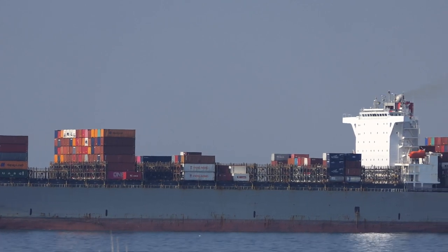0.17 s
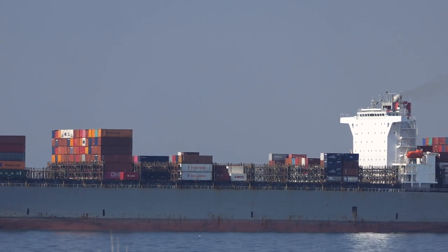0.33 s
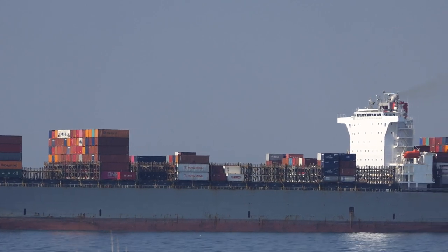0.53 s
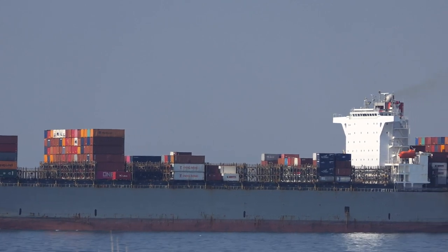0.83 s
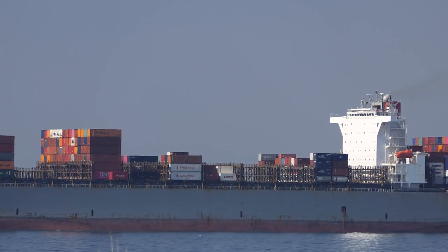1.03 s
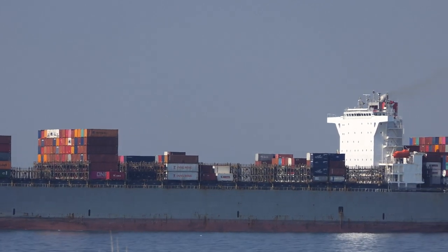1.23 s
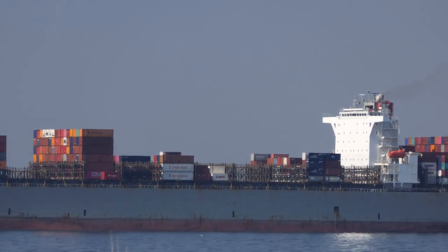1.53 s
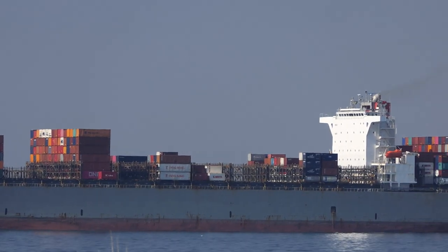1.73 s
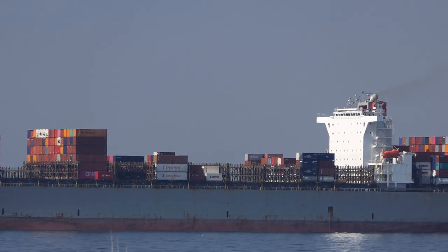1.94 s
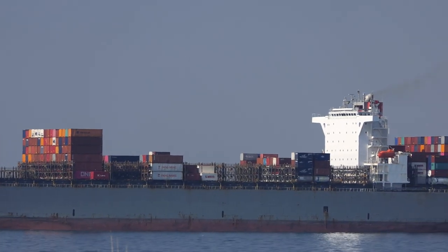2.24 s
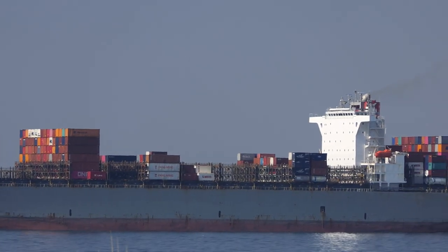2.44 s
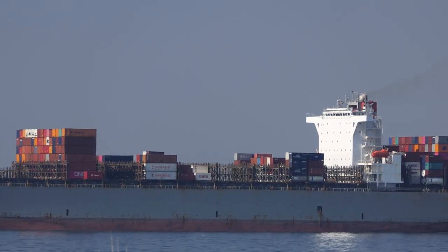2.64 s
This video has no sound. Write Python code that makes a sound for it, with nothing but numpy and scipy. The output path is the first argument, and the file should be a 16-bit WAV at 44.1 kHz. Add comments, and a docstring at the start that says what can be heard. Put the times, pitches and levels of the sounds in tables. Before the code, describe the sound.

A distant ship gives a steady, gently pulsing drone and deep rumble across open water. Midway, faint ticks and a rustle are followed by a soft bump, while light wind and a thin hiss sit on the microphone.

```python
"""A distant ship on calm water

A large ship passes far out. Its exhaust drones near 350 Hz over low engine tones and a dull rumble.
The drone reaches the two microphone openings in opposite phase: one is pushed as the other is pulled.
Light wind presses on the openings and the recorder hisses. There are small ticks, soft bumps, a faint
rustle and a brief faint ring near 1100 Hz. Below, left is mid + side and right is mid - side."""
import sys
import numpy as np
from scipy import signal
from scipy.fft import rfft, irfft
from scipy.io import wavfile
from scipy.ndimage import uniform_filter1d

SR = 44100
rng = np.random.default_rng(int(sys.argv[2]) if len(sys.argv) > 2 else 0)


def persist_wave(psi):
    """Save psi, clipped to +-1, as 16-bit WAV."""
    counts = np.round(np.clip(psi, -1, 1) * 32767).astype(np.int16)
    wavfile.write(sys.argv[1], SR, np.atleast_2d(counts).T)


N = 123479


def from_db(db):
    """Turn decibels into a number to multiply by."""
    return 10 ** (np.asarray(db) / 20)


def unit_power(x):
    """Scale a sound to an average power of 1."""
    return x / np.sqrt(np.mean(x ** 2) + 1e-20)


def over_time(rows):
    """Join (time_s, value) points with straight lines, giving a value for every sample."""
    return np.interp(np.arange(N) / SR, *np.transpose(rows))


def over_pitch(rows, hz):
    """Read between (pitch_hz, value) points at the given pitches."""
    pitches, values = np.transpose(rows)
    return np.interp(np.log(hz), np.log(pitches), values)


def resonate(x, hz, width_hz):
    """Let a sound ring at one pitch and weaken the pitches around it."""
    r = np.exp(-np.pi * width_hz / SR)
    gain = (1 - r * r) / 2
    return signal.lfilter([gain, 0, -gain], [1, -2 * r * np.cos(2 * np.pi * hz / SR), r * r], x)


def exhaust_drone():
    """The exhaust's main note wavers, swells and sinks; the ship's funnel keeps it in a narrow band."""
    # The note's wavering pitch: time_s, pitch_hz
    pitch = [(0, 350.7), (.1, 353), (.17, 354.3), (.25, 362.2), (.32, 349), (.45, 347), (.6, 351),
             (.8, 348.2), (.95, 354.5), (1.0, 348), (1.25, 349.9), (1.45, 350), (1.6, 358.7), (1.7, 344.3),
             (1.76, 357), (1.85, 345.6), (2.0, 343.8), (2.07, 356), (2.2, 351.3), (2.33, 348), (2.4, 348.3),
             (2.5, 345.9), (2.56, 352.1), (2.8, 344.5)]
    # The note's strength before the funnel: time_s, level_db
    swells = [(0.0, -38.5), (0.07, -45.5), (0.14, -37), (0.26, -50), (0.4, -34.5), (0.46, -43),
              (0.56, -34.5), (0.7, -46.5), (0.73, -46), (0.76, -40), (0.82, -59), (0.86, -30.5),
              (0.89, -40), (0.92, -42), (0.96, -31), (1.0, -39), (1.02, -37.5), (1.11, -39), (1.14, -36.5),
              (1.17, -43), (1.18, -37), (1.21, -66), (1.24, -35), (1.28, -36), (1.32, -51), (1.33, -33),
              (1.37, -52), (1.46, -32.5), (1.52, -39), (1.67, -53.5), (1.69, -37), (1.72, -34.5),
              (1.78, -49), (1.79, -50), (1.82, -35.5), (1.87, -52), (1.99, -32.5), (2.04, -45.5),
              (2.17, -42), (2.19, -35), (2.23, -41.5), (2.27, -33), (2.31, -43), (2.35, -32.5), (2.44, -47),
              (2.47, -32.5), (2.55, -36.5), (2.58, -49), (2.62, -41.5), (2.72, -54.5), (2.77, -32),
              (2.8, -33)]
    funnel_hz, funnel_width_hz = 359.1, 72
    side_boost_db, side_db_per_hz, side_lag_s = 20, 0.55, 0.00023
    # Slow noise blurs the note's phase and strength; most of the change in strength is evened out.
    below_3_hz = signal.butter(2, 3, fs=SR, output="sos")
    wander = [1, 1j] @ signal.sosfilt(below_3_hz, rng.standard_normal((2, N + SR)))[:, SR:]
    wander /= (abs(wander) + .2 * np.std(wander)) ** .95
    hz = over_time(pitch)
    note = unit_power(np.real(wander * np.exp(2j * np.pi * np.cumsum(hz) / SR)))
    note *= uniform_filter1d(from_db(over_time(swells)), int(.02 * SR))  # smoothed over 20 ms
    for _ in range(2):
        note = resonate(note, funnel_hz, funnel_width_hz)
    # Side is far stronger than mid, which puts left and right in opposite phase.
    side_gain = from_db(side_boost_db + side_db_per_hz * (hz - funnel_hz))
    mid, side = np.array([note, note * side_gain]) + exhaust_resonances()
    side = np.interp(np.arange(N) - side_lag_s * SR, np.arange(N), side)
    return np.array([mid + side, mid - side])


def exhaust_resonances():
    """Noise rings at the exhaust's weaker, steady pitches; returns mid and side."""
    # Resonances around the main note: pitch_hz, width_hz, mid_peak_db (power per Hz), side_boost_db
    resonances = [(232.4, 12, -71, 13), (254.3, 17, -72, 12), (278, 13, -66, 12), (310, 20, -61.5, 15),
                  (334, 16, -60, 16), (365, 14, -62.5, 20), (385, 12, -74, 22), (450.3, 18.4, -77, 13),
                  (543.5, 11.6, -81, 13)]
    out = 0
    for hz, width_hz, mid_db, side_boost_db in resonances:
        noise = np.sqrt(SR / 2) * rng.standard_normal(N + SR)  # power of 1 per Hz
        ring = resonate(resonate(noise, hz, width_hz), hz, width_hz)[SR:]
        out += ring * from_db([[mid_db], [mid_db + side_boost_db]])
    return out


def engine_tones():
    """The engine hums at a few low pitches, blurred by the long way the sound travels."""
    # The engine's tones: pitch_hz, level_db
    tones = [(30, -81), (54, -105), (60, -49), (91, -61), (167, -57.5)]
    out = 0
    for hz, db in tones:
        hum = resonate(rng.standard_normal(N + SR), hz, width_hz=1.38)[SR:]
        out += from_db(db) * unit_power(hum)
    return out


def wind():
    """Wind presses in slow lumps, almost alike on both microphone openings but harder on the left."""
    # The wind's pressure, midway between left and right: time_s, level_db
    gusts = [(0.0, -30.5), (0.58, -68), (0.6, -69), (0.93, -51.5), (1.52, -41.5), (1.81, -35.5),
             (1.85, -39.5), (2.37, -47.5), (2.42, -20), (2.52, -49), (2.56, -32), (2.8, -65)]
    unshared_gain, lean_db = 0.03, 3.5
    below_9_hz = signal.butter(3, 9, fs=SR, output="sos")
    lumps = signal.sosfilt(below_9_hz, rng.standard_normal((3, N + SR)))[:, SR:]
    shared, left, right = [unit_power(row - row.mean()) for row in lumps]
    pair = shared + unshared_gain * np.array([left, right])
    return from_db(over_time(gusts)) * pair * from_db([[lean_db], [-lean_db]])


def small_sounds():
    """Small ticks, soft bumps, and a brief faint ring near 1100 Hz as the drone swells."""
    # Each is a short puff of noise: start_s, peak_db, pitch_hz, rise_s, half_width_octaves
    puffs = [(1.2215, -55, 6480, 0.0011, 0.58), (1.2256, -47.5, 2100, 0.0015, 0.53),
             (1.2258, -49, 1150, 0.0033, 0.1), (1.2565, -48.5, 5040, 0.00086, 0.28),
             (1.284, -51, 2570, 0.0053, 0.73), (1.289, -47, 1200, 0.0021, 0.44),
             (1.295, -45.5, 3430, 0.00074, 0.81), (1.69, -41.5, 497.2, 0.019, 0.75),
             (1.70, -58, 1100, .012, 0.075), (2.06, -52.5, 1465, .0017, 0.53),
             (2.16, -59, 1192, .012, 0.17)]
    out, t = np.zeros(N), np.arange(4000) / SR
    for start_s, peak_db, hz, rise_s, octaves in puffs:
        band = signal.butter(3, [hz * 2 ** -octaves, hz * 2 ** octaves], "band", fs=SR, output="sos")
        puff = signal.sosfilt(band, rng.standard_normal(len(t)) * t * np.exp(-t / rise_s))
        start = int(start_s * SR)
        out[start:start + len(t)] += from_db(peak_db) * puff / abs(puff).max()
    return out


def rustle():
    """Thousands of tiny clicks blend into a faint rustle around the first ticks."""
    # The rustle's rise and fall: time_s, level_db
    loudness = [(1.2, -99), (1.225, -65), (1.26, -69), (1.295, -65.5), (1.32, -72.5), (1.5, -75.5),
                (1.6, -99)]
    clicks_per_s, band_hz = 4800, [1070, 4800]
    clicks = rng.standard_normal(N) * (rng.random(N) < clicks_per_s / SR)
    band = signal.butter(2, band_hz, "band", fs=SR, output="sos")
    return from_db(over_time(loudness)) * unit_power(signal.sosfilt(band, clicks))


def rumble_and_hiss():
    """A dull rumble and the recorder's hiss: noise whose level flickers slightly in each octave."""
    # Tone colour of the mid noise: pitch_hz, relative_db
    mid_colour = [(20, 3.5), (60, -1.5), (100, -1.5), (160, -9.5), (190, -13), (300, -27), (400, -15),
                  (550, -14.5), (700, -23.5), (1000, -32), (1500, -42.5), (3000, -46), (6000, -49),
                  (15000, -50)]
    # Tone colour of the side noise, on the same scale: pitch_hz, relative_db
    side_colour = [(20, -6.5), (60, -3.5), (100, -18), (160, -4), (200, -5.5), (300, -21), (410, -13),
                   (500, -10), (600, -19.5), (700, -18), (1000, -29.5), (1500, -35.5), (3000, -43.5),
                   (6000, -47), (15000, -49)]
    # How much louder the left is than the right: pitch_hz, difference_db
    left_lean = [(60, -1), (150, 1), (380, 3), (950, 1.5), (2380, 3), (5980, 2.5), (15000, 1.5)]
    mid_level_db, flicker_db, flickers_per_s = -41, 1.2, 6.43
    hz = np.maximum(np.fft.rfftfreq(N, 1 / SR), 1)
    colour = from_db([over_pitch(mid_colour, hz), over_pitch(side_colour, hz)]) * (hz > 18)
    mid, side = rfft(rng.standard_normal((2, N))) * colour
    mid_strength = np.sqrt(np.mean(irfft(mid, N) ** 2))
    lean = from_db(over_pitch(left_lean, hz) / 2)
    pair = np.array([(mid + side) * lean, (mid - side) / lean])
    out, t = 0, np.arange(N) / SR
    for octave in range(4, 15):  # bands centred on 16 Hz up to 16 kHz
        band = np.clip(1 - abs(np.log2(hz) - octave), 0, 1)
        flicker = np.interp(t * flickers_per_s, np.arange(200), rng.standard_normal(200))
        out += irfft(pair * band, N) * from_db(flicker_db * flicker)
    return from_db(mid_level_db) * out / mid_strength


def scene():
    """Add up the ship, the background, the wind and the small sounds."""
    to_the_left = np.array([[1], [0.48]])  # left gain, right gain
    ship = exhaust_drone() + engine_tones()
    return ship + rumble_and_hiss() + wind() + (small_sounds() + rustle()) * to_the_left


def record(dry):
    """The recorder steeply cuts away the highest treble."""
    cutoff_hz = 15900
    return signal.sosfilt(signal.cheby2(16, 60, cutoff_hz, fs=SR, output="sos"), dry)


dry = scene()
out = record(dry)
persist_wave(out)
```